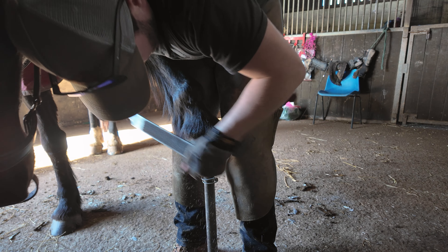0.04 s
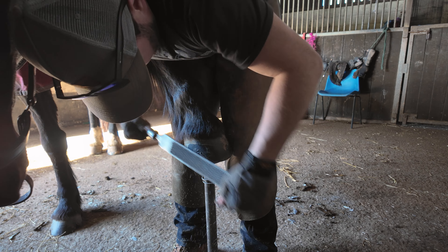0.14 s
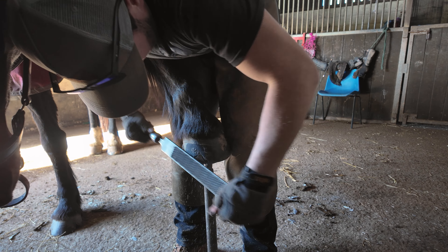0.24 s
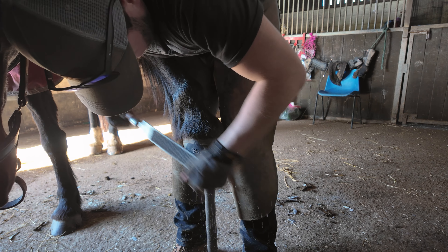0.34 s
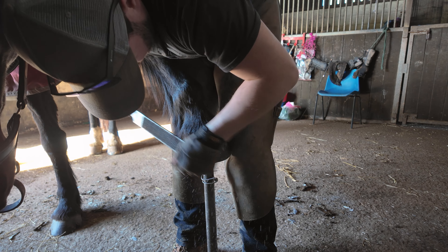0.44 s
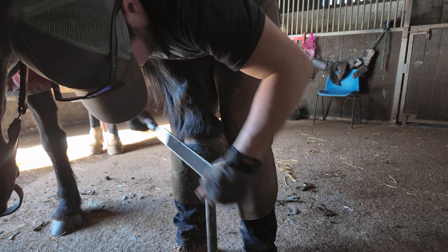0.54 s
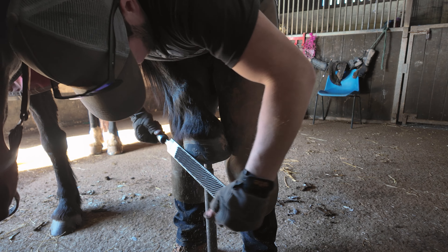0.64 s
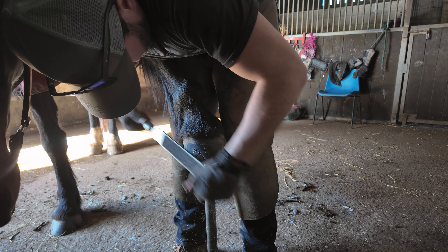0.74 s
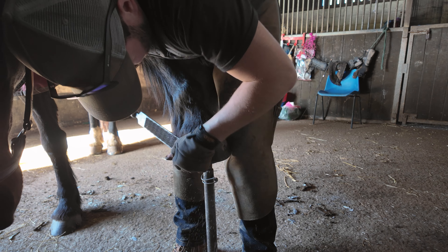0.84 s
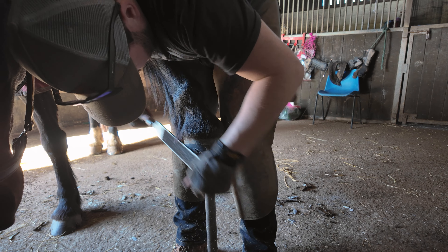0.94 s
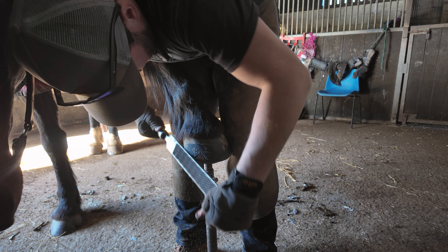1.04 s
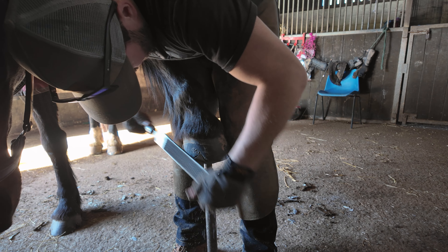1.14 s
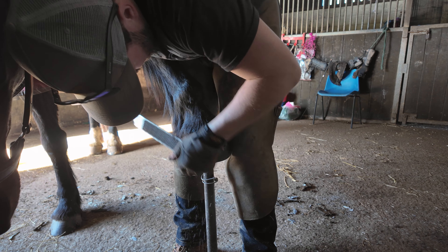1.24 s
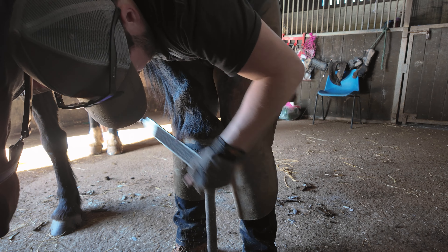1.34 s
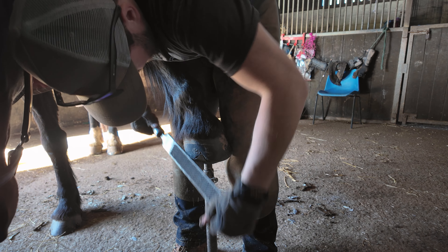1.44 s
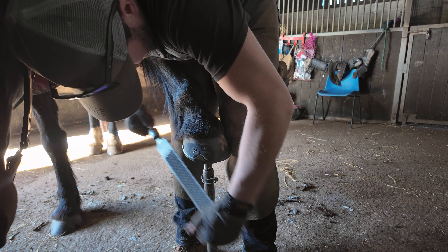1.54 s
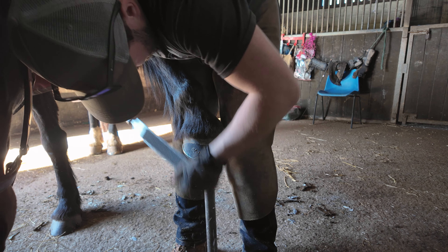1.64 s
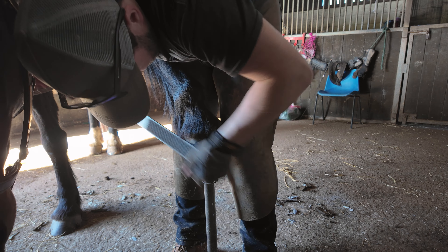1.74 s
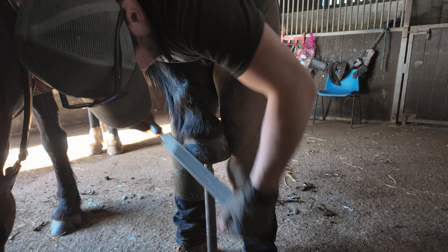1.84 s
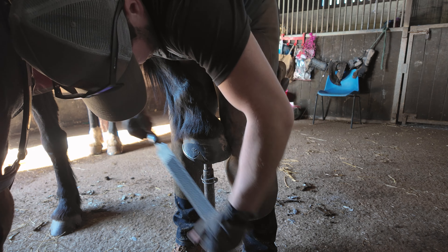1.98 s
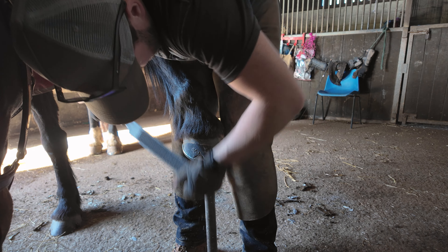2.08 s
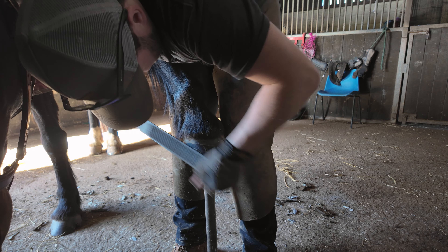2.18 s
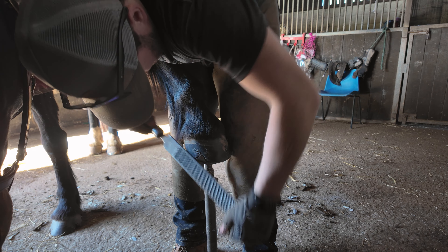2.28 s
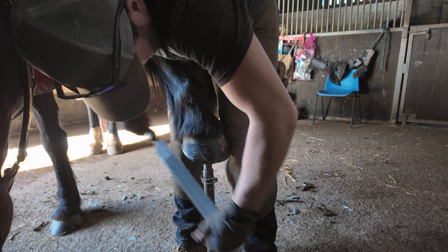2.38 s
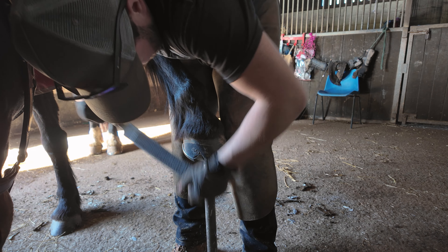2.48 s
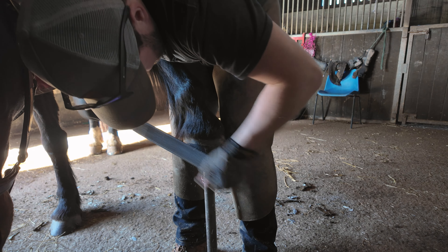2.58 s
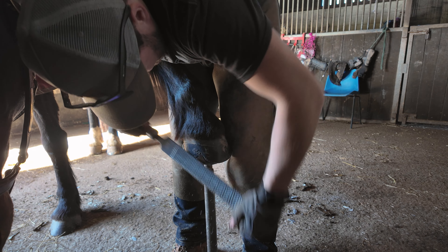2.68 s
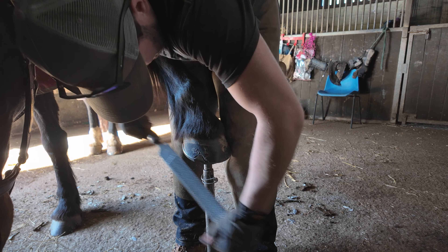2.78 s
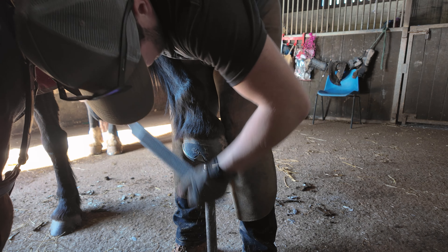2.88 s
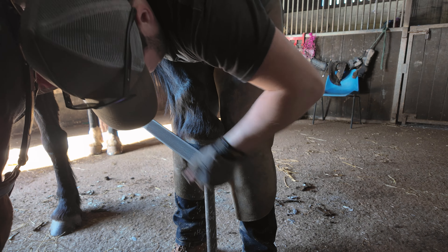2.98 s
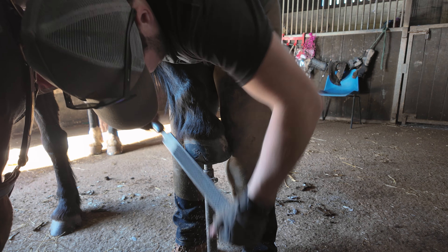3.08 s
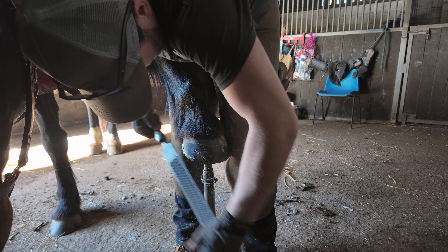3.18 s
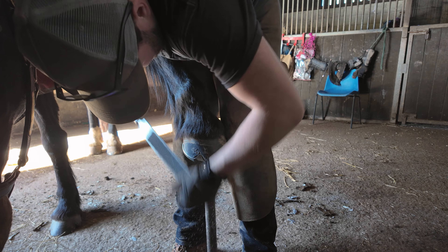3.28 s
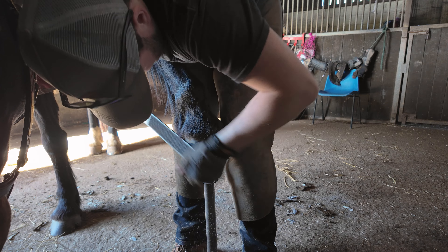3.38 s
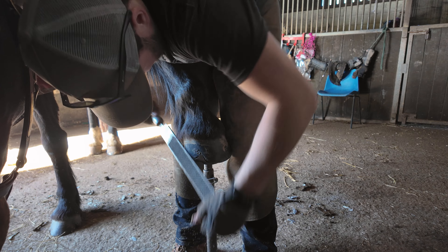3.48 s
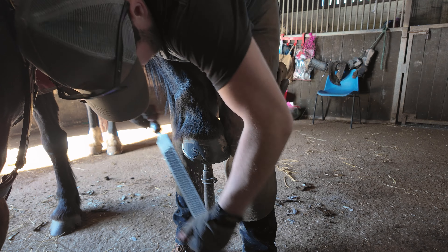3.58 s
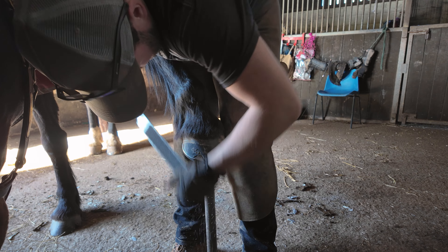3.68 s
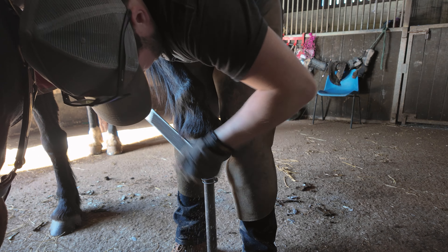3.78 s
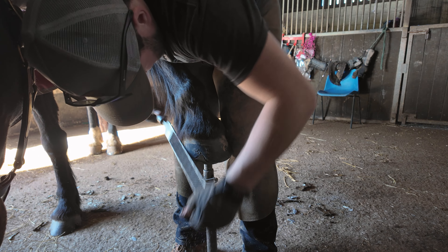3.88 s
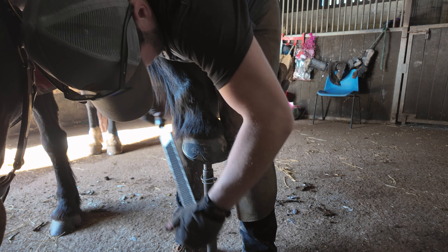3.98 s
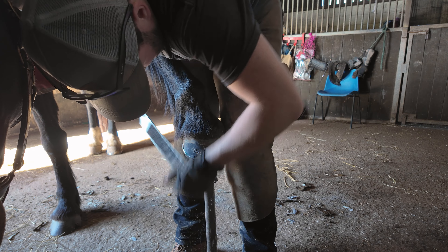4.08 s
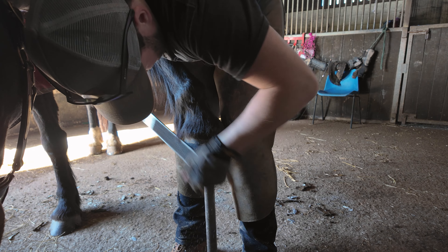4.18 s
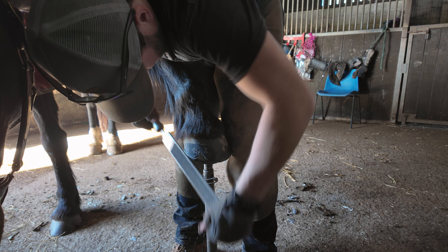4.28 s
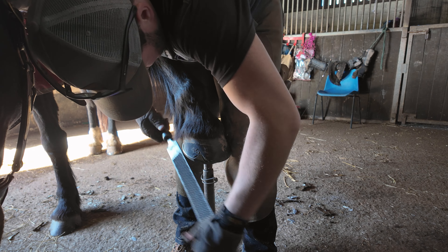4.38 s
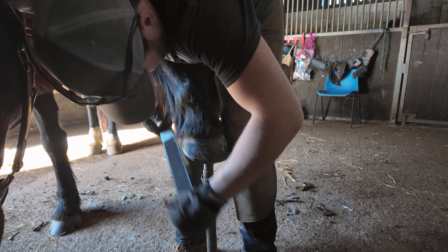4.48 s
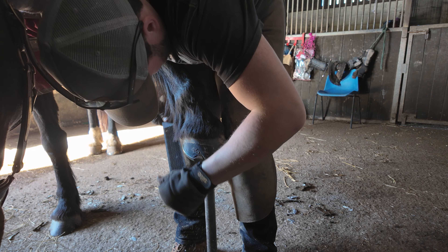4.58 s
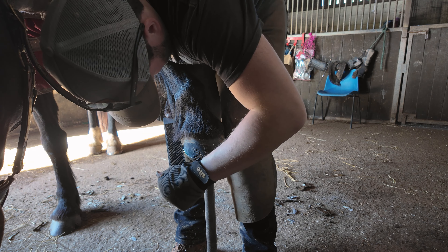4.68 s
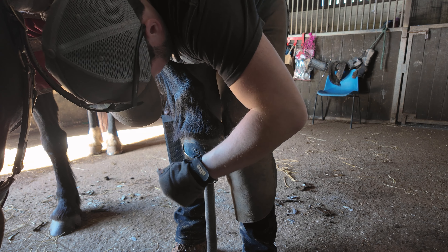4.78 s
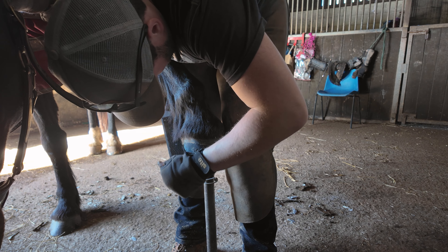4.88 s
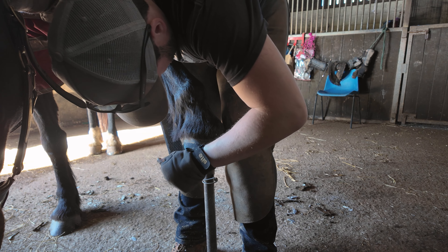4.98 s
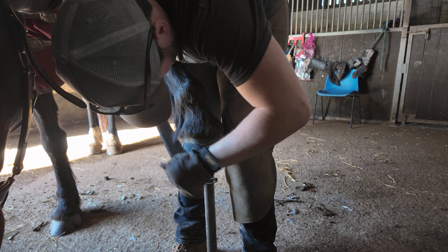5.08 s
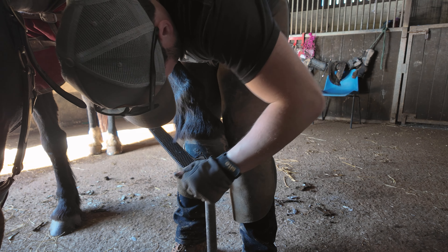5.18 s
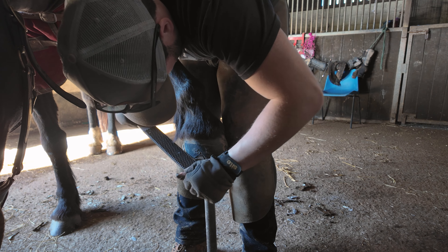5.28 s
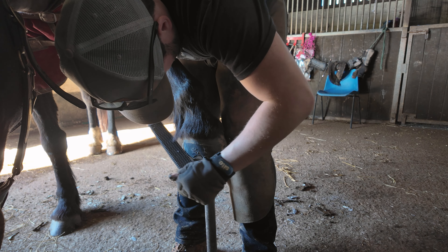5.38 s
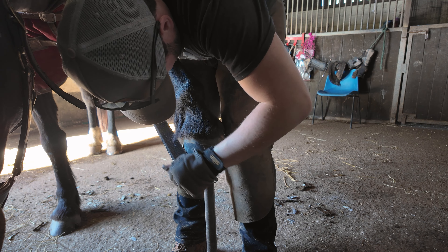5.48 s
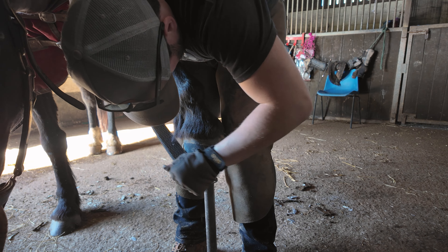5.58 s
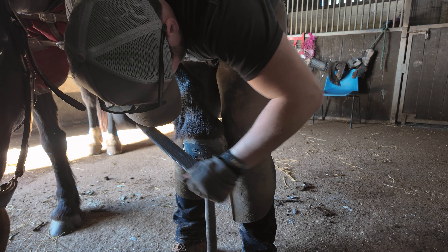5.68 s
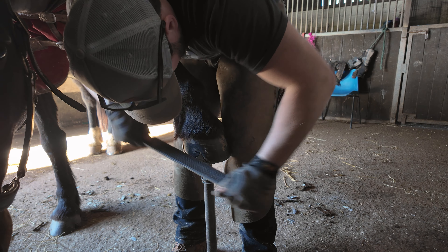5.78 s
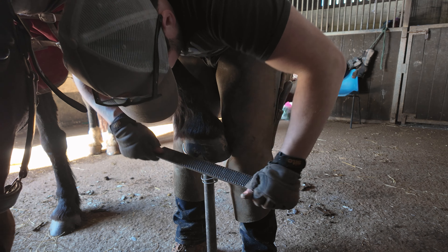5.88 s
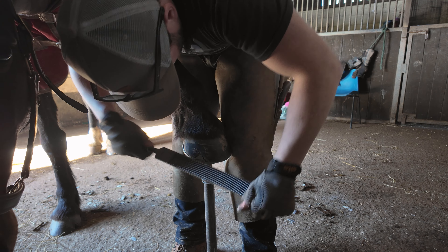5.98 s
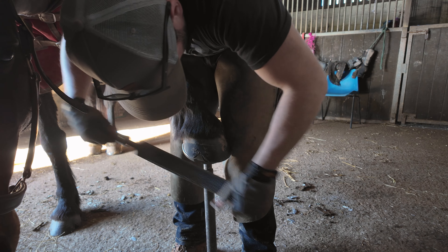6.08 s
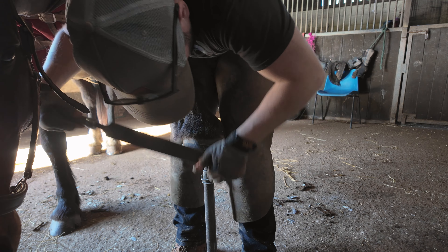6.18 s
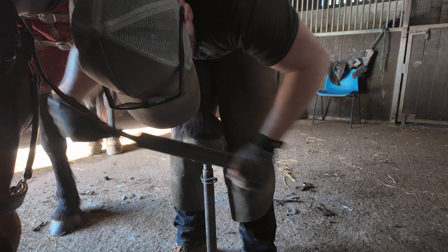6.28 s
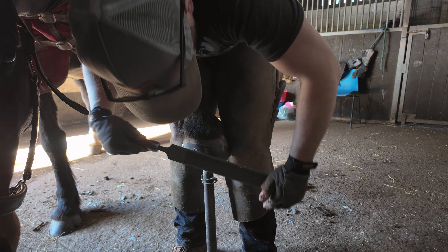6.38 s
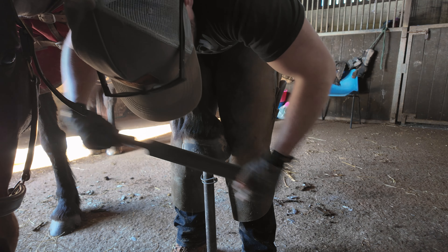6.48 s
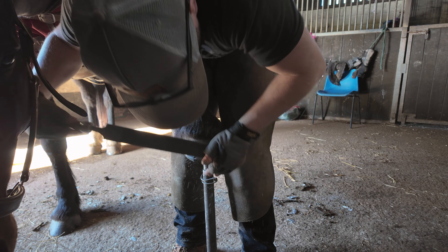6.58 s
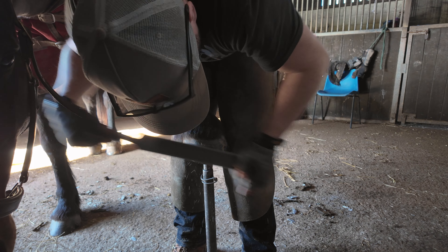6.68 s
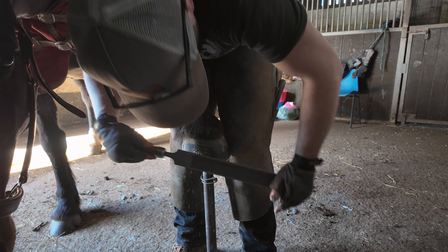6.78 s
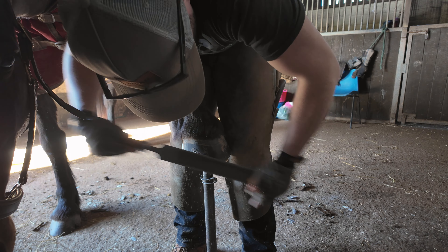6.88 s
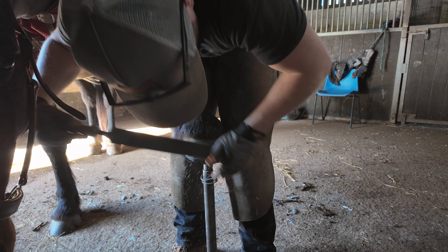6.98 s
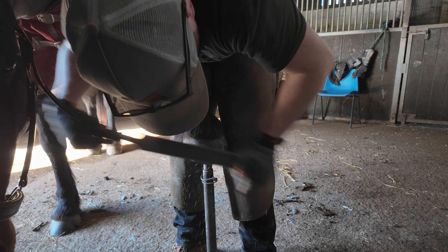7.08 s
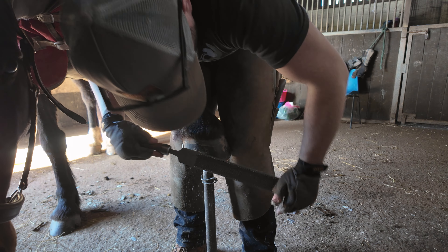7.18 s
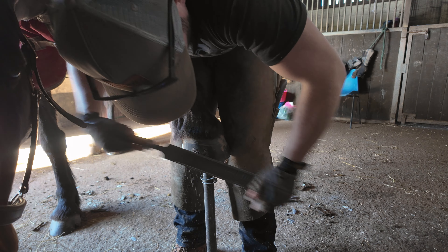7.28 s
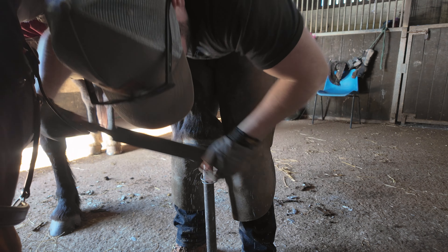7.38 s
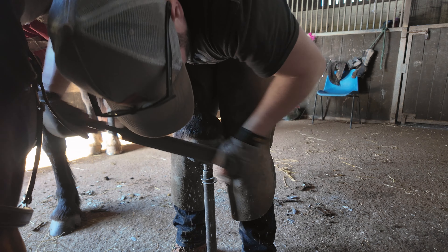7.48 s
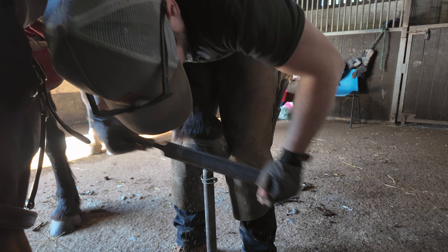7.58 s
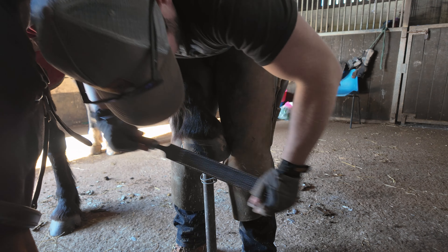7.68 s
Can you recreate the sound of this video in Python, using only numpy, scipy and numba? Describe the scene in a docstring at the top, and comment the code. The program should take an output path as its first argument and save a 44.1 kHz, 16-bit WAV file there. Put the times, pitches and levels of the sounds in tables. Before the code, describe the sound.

In a quiet stable, heard close up, a steel rasp works on a horse's hoof propped on an iron stand. From 0 to 1.5 s gritty scrapes alternate quickly, roughly five a second, bright and metallic with a hollow groan of the hoof around 500 Hz. From 1.8 to 4.4 s come more separate, forceful strokes about 0.4 s apart, with light slides between; a sharp clack stands out at 2.24 s, and the blade catches at 1.3 and 3.05 s. From 4.5 to 5.6 s it falls back to faint touches, small ticks and dull low knocks. A longer stroke swells at 5.75 to 6 s, then after a brief gap quick, softer, looser back-and-forth filing runs from 6.3 s to the end at about 7.7 s. Short, faint echoes and a very low airy hush surround it.

```python
"""In a wooden stable a steel rasp is pushed and drawn over a horse's hoof that rests on an iron stand.
The teeth tear chips of horn: dense random blows excite the modes of the blade, hoof and stand.
Bite, looseness and lean of the blade set how hard each of its modes is struck; filtered blows give the scrape.
Catches, dull knocks, light slides between strokes and short low swells during them are added;
sparse echoes and quiet noise fill the stable."""
import sys
import numpy as np
from scipy import signal
from scipy.io import wavfile
from numba import njit

SR = 44100
rng = np.random.default_rng(int(sys.argv[2]) if len(sys.argv) > 2 else 0)


def bounce(signal):
    """Save signal as a 16-bit WAV file at the path given by the first command-line argument."""
    frames = np.transpose(np.atleast_2d(signal))
    limited = np.clip(frames, -1, 1)
    pcm = np.round(limited * 32767).astype(np.int16)
    wavfile.write(sys.argv[1], SR, pcm)


N = 341334
STEP = 32  # samples between updates of slow quantities
SLOW = np.arange(0, N, STEP) / SR  # times of those updates, s


def gain_of(db):
    """Level definition: 20 dB is a tenfold amplitude."""
    return 10 ** (np.asarray(db) / 20)


def evened(x):
    """Power normalisation: scale to an rms of 1."""
    return x / np.sqrt(np.mean(x ** 2) + 1e-20)


def add(mix, start_s, sound):
    """Superposition: signals add from start_s onward."""
    part = mix[round(start_s * SR):][:len(sound)]
    part += sound[:len(part)]


def read(points, hz):
    """Interpolation of a frequency table on a logarithmic pitch axis."""
    table_hz, value = np.transpose(points)
    return np.interp(np.log(hz + 1), np.log(table_hz + 1), value)


def colour(x, spectrum):
    """Minimum-phase filtering: the log spectrum fixes the phase of a causal response of unit energy."""
    size = 2048
    level_db = np.maximum(read(spectrum, abs(np.fft.fftfreq(size, 1 / SR))), -100)
    log_gain = np.log(gain_of(level_db))
    response = np.exp(np.conj(signal.hilbert(log_gain)))
    taps = np.fft.ifft(response).real[:size // 2]
    return signal.oaconvolve(x, taps / np.linalg.norm(taps))[:N]


def wander(per_s):
    """Random modulation: straight lines between clipped normal draws, per_s draws a second, at the slow times."""
    steps = np.clip(rng.standard_normal(2500), -2.5, 1.6)  # dips go deeper than swells rise
    return np.interp(SLOW * per_s, np.arange(len(steps)), steps)


def held(slow):
    """Sample and hold: each slow value lasts one update step."""
    return np.repeat(slow, STEP)[:N]


def air():
    """Random noise: filtered random pressure of the stable, swelling a little."""
    # Spectrum of the quiet air: pitch_hz [Hz], relative_level_db [dB per Hz]
    spectrum = [(15, -25), (25, 21), (97, -10), (170, -2), (489, -8), (1290, -6.5), (1560, -9.5),
                (4730, -10.5), (6730, -19), (11900, -35), (16000, -59)]
    level_db = -60.5 + 2.0 * held(wander(per_s=3.66))
    return gain_of(level_db) * colour(rng.standard_normal(N), spectrum)


def total(db, rest_db):
    """Incoherent addition: powers of all movements and of the resting level sum."""
    return 10 * np.log10((gain_of(db) ** 2).sum(0) + gain_of(rest_db) ** 2)


def motion():
    """Load kinematics: each stroke, slide or swell rises, holds and falls; power shares weigh the hold on the blade."""
    # Strokes of the rasp: start_s, rise_s, hold_s, fall_s [s]; force_db, change_db over the hold [dB];
    # hoof_db, stand_db relative to the force [dB]; bite (+ teeth cutting, - sliding back),
    # looseness (+ held lightly, - pressed down), lean (+ blade flat on the wall, - on its edge) [no unit];
    # groan_first_hz, groan_last_hz [Hz]
    strokes = [(0.002, 0.041, 0.0093, 0.088, -24, -8, -8.5, -23.5, 0, -0.032, 3, 495, 470),
               (0.147, 0.089, 0.085, 0.03, -28.5, -6, -11, -12.5, 1.83, -0.54, -0.06, 535, 547),
               (0.416, 0.023, 0.039, 0.019, -23.5, -2, -9.5, -19, -2.5, 0.19, 1.06, 620, 625),
               (0.571, 0.023, 0.16, 0.03, -31.5, -5.5, -4.5, -13, 1.12, -1.57, 0, 554, 510),
               (0.794, 0.02, 0.082, 0.072, -32, 10.5, -6.5, -26.5, -2, -0.88, 1, 520, 464),
               (1, 0.05, 0.13, 0.039, -31, -1, -10.5, -14.5, 0.5, -1.6, 0.4, 532, 520),
               (1.212, 0.054, 0.04, 0.12, -32, 6, -10, -22, -2, -0.071, 1.4, 506, 520),
               (1.427, 0.049, 0.14, 0.025, -27.5, -3, -7.5, -19, 0.3, -1.3, 0.43, 580, 510),
               (1.852, 0.037, 0.15, 0.031, -29.5, 0.5, -7, -21.5, 1.84, 0.0068, 0.14, 473, 577),
               (2.325, 0.014, 0.076, 0.072, -29, 3.5, -11, -23, 1.16, 0.062, -1, 560, 560),
               (2.695, 0.026, 0.021, 0.048, -29.5, -1, -5.5, -18, 1.6, 0.089, 0.7, 590, 595),
               (2.765, 0.031, 0.054, 0.056, -28, 0.5, -7, -17, 0, -0.015, 0, 613, 476),
               (3.125, 0.028, 0.094, 0.04, -25, 0, -8.5, -18.5, 2, 0.028, -0.5, 575, 535),
               (3.509, 0.021, 0.12, 0.046, -29, 0.5, -5.5, -19, 1.3, -0.92, -0.1, 557, 564),
               (3.904, 0.034, 0.11, 0.045, -25, -6, -6, -22, 0.24, -1.34, 0.4, 600, 446),
               (4.276, 0.038, 0.1, 0.061, -33, 7.5, -7, -22, 0.83, -1.24, 0.6, 620, 440),
               (4.889, 0.094, .005, 0.043, -42.5, -7, 2, -6, -4, 0.16, -1.7, 520, 503),
               (5.227, 0.051, .005, 0.061, -39.5, -8, -5.5, -13, 0, -1.3, -4.5, 510, 506),
               (5.522, 0.034, 0.045, 0.05, -49, -10, 2.5, -8, -5.5, -0.11, -8, 510, 486),
               (5.731, 0.037, 0.16, 0.15, -39, 7, -7.5, -13.5, 1.24, -0.28, -1.1, 546, 533),
               (6.307, 0.089, 0.068, 0.081, -33, -0.5, -9.5, -16, -0.5, 1.3, -0.3, 630, 487),
               (6.553, 0.038, 0.12, 0.039, -34, -8, -7.5, -10.5, -2, 0.8, 0.24, 523, 487),
               (6.735, 0.035, 0.087, 0.077, -35.5, 2, -12, -23, 0.9, 0.68, 0, 470, 584),
               (6.969, 0.033, 0.091, 0.044, -37, 0, -8.5, -12.5, 0.2, 3, 0.5, 480, 490),
               (7.149, 0.036, 0.09, 0.053, -34.5, 2, -14.5, -16.5, 0.8, 1, 0.6, 500, 503),
               (7.37, 0.026, 0.071, 0.091, -31.5, 0, -5.5, -15, -2, 1.2, -0.8, 514, 480),
               (7.569, 0.089, .005, 0.15, -28.5, 2, -11, -25, 0.4, 0.78, -1.3, 625, 460)]
    # Light slides between strokes, and short low swells of hoof and blade during them:
    # start_s, hold_s [s]; force_db [dB]; hoof_db, stand_db, blade_ring_db relative to the force [dB]
    slides = [(0.493, 0.039, -35, -4.5, -17, 1.3), (1.654, 0.15, -45, -13, -29, -12),
              (1.796, 0.024, -47.5, 0, 1, 8), (2.063, 0.053, -52, -15, -8, -4.5),
              (2.253, 0.061, -38.5, -6, -8, -0.5), (2.654, 0.03, -45, -9, -4, 3),
              (3.054, 0.057, -39.5, -7, -7, 5.3), (3.33, 0.14, -50.5, -13, -15, -5),
              (3.446, 0.035, -46.5, -18, -3.5, -2), (3.682, 0.19, -45.5, -22, -20, -9),
              (3.852, 0.057, -44.5, -23, -13, -3), (4.105, 0.13, -48, -12, -26, -9),
              (4.254, 0.032, -47.5, -10, 2, 10.5), (4.453, 0.1, -48.5, -8, -23, -3.5),
              (4.587, 0.067, -51, -18, -24, -4.5), (4.737, 0.013, -49.5, 5, 0, -2),
              (5.923, 0.078, -43, 9, -0.5, -3), (6.024, 0.18, -50.5, -13, -22, -2.5),
              (6.297, 0.036, -48.5, 4, -28, 6), (6.857, 0.025, -51.5, 11, 0, -.6),
              (7.595, 0.018, -45.5, 3.5, 1.5, -3), (5.297, 0.035, -53, -8, -16, -15),
              (5.54, .05, -53.5, 0, -2, -11)]
    groan_rest_hz = 495
    slide_rise_s, slide_fall_s, slide_fade_db = 0.0077, 0.032, -1.5
    slide_bite, slide_looseness, slide_lean = -0.98, 0.1, 0
    slide_rows = [(start_s, slide_rise_s, hold_s, slide_fall_s, db, slide_fade_db, hoof_db, stand_db,
                   slide_bite, slide_looseness, slide_lean, groan_rest_hz, groan_rest_hz)
                  for start_s, hold_s, db, hoof_db, stand_db, _ in slides]
    extra_ring_db = np.r_[np.zeros(len(strokes)), np.transpose(slides)[-1]][:, None]
    (start, rise, hold, fall, force_db, change_db, hoof_db, stand_db, bite, looseness, lean,
     first_hz, last_hz) = np.vstack([strokes, slide_rows]).T[:, :, None]

    t = SLOW - start - rise  # 0 where the hold begins
    # the force climbs 20 dB in a rise and drops as much in a fall, going on at that slope outside
    swing_db = 20 * (np.minimum(t / rise, 0) - np.maximum((t - hold) / fall, 0))
    held_db = force_db + change_db * np.clip(t / hold, 0, 1)
    moving_db = held_db + swing_db
    # the heavier bodies follow only part of the swing
    hoof_loads_db = held_db + hoof_db + 0.85 * swing_db
    stand_loads_db = held_db + stand_db + 0.35 * swing_db
    # the resting levels: blade and hoof never lie quite still
    scrape_db = total(moving_db, -65.5)
    ring_db = total(moving_db + extra_ring_db, -75)
    load_db = total(hoof_loads_db, -71)
    shake_db = total(stand_loads_db, -65)

    share = gain_of(moving_db - scrape_db) ** 2
    load_share = gain_of(hoof_loads_db - load_db) ** 2
    progress = np.clip((t + rise) / (rise + hold + fall), 0, 1)
    bite_now = bite + 1 * (progress - .5)  # both grow from start to end of each movement
    looseness_now = looseness + 1.37 * (progress - .5)
    travel = (progress - .5) * np.clip(bite + 1, 0, 1)  # along the blade, fading out as bite nears -1
    pitch_hz = first_hz + (last_hz - first_hz) * progress
    groan_hz = groan_rest_hz + (load_share * (pitch_hz - groan_rest_hz)).sum(0)
    hold_on_blade = [(share * x).sum(0) for x in (bite_now, looseness_now, lean, travel)]
    return (scrape_db, ring_db, load_db, shake_db, *hold_on_blade, groan_hz)


def forces(*slow_levels_db):
    """Contact excitation: levels become scrape, blade, hoof and stand strengths, first blows and pressure 0-1."""
    # Teeth catching or the blade landing: start_s [s], level_db [dB],
    # hoof_db relative to the blow [dB], decay_t60_ms [ms]
    catches = [(0.0331, -18, -32, 39), (0.043, -22, -10, 50), (0.169, -26, -5.5, 74), (0.435, -19, 6, 29),
               (0.601, -39, -21, 31), (0.818, -27, -8, 25), (1.022, -31.5, 12, 120), (1.235, -23, -7, 37),
               (1.285, -10, -30, 62), (1.2921, -11, -42, 42), (1.4452, -26.5, 8, 48),
               (1.8134, -24.5, -9, 25.6), (1.866, -28, 4, 33), (2.236, -4, -5.5, 43),
               (2.3445, -21, -35, 62), (2.6637, -33.5, 5, 24), (2.709, -24, 9, 57), (2.798, -17.5, -29, 44),
               (3.054, -14, 4, 53), (3.14, -24, -30, 17), (3.462, -28, -9, 44), (3.523, -26, -12, 20),
               (3.8638, -25, -1, 31), (3.918, -30, -12, 30), (4.2589, -17.5, 0.5, 20),
               (4.311, -33.5, 17, 73), (4.404, -25, -5, 32), (4.743, -36.5, 7, 26),
               (4.892, -43.5, 19.5, 110), (5.26, -30, -17, 30), (5.272, -33, -32, 41), (5.625, -30, -20, 6),
               (5.706, -36, -8, 29), (5.7435, -28, -6, 27), (6.0967, -31.5, -3, 85),
               (6.3038, -37, 13.5, 13), (6.568, -25, -5.5, 30), (6.585, -29.5, 4, 52),
               (7.021, -32, -16.5, 42), (7.054, -24, -21, 41), (7.343, -41.5, 21.5, 21),
               (7.392, -36, -14, 24), (7.403, -35, 13.5, 54), (7.654, -24.5, 6, 130)]
    levels_db = [np.interp(np.arange(N) / SR, SLOW, db) for db in slow_levels_db]
    stall = round(.009 * SR)
    for start_s, *_ in catches:  # the blade stalls or hovers just before it catches
        at = round(start_s * SR)
        for db in levels_db:
            db[at - stall:at] = np.minimum(db[at - stall:at], db[at - stall])
    scrape, blade, hoof, stand = (gain_of(db) for db in levels_db)
    pressure = np.clip((levels_db[0][::STEP] + 66.5) / 32, 0, 1)

    first = np.zeros(N)
    ms = np.arange(SR // 4) * 1000 / SR
    for start_s, level_db, hoof_db, decay_ms in catches:
        burst = gain_of(level_db - 10.0 - 60 * ms / decay_ms)  # envelope of a spray of chips
        add(scrape, start_s, burst)
        add(blade, start_s, burst)
        add(hoof, start_s, gain_of(hoof_db) * burst)
        add(first, start_s, gain_of([level_db - 11.0]))
    return scrape, blade, hoof, stand, first, pressure


def chips(per_s, spread_db, chatter_db):
    """Shot noise: single-tooth blows at random moments, a few large, their strength modulated by chatter."""
    chatter = held(wander(per_s=160))
    size = gain_of(spread_db * np.minimum(rng.exponential(1, N), 4) + chatter_db * chatter)
    struck = rng.random(N) < per_s / SR
    return evened(size * rng.choice([-1., 1.], N) * struck)


def bunching():
    """Amplitude modulation: the teeth bite in clumps."""
    return evened(gain_of(1.4 * held(wander(per_s=55))))


def ring(x, hz, width_hz):
    """Fixed resonance: one complex pole with a peak gain near 1."""
    r = np.exp(-np.pi * width_hz / SR)
    return 2 * signal.lfilter([1 - r], [1, -r * np.exp(2j * np.pi * hz / SR)], x).real


@njit
def ring_moving(x, gain, pole, step):
    """Driven damped oscillator: one mode whose drive, pitch and damping change slowly."""
    out, state = np.zeros(len(x)), 0j
    for n in range(len(x)):
        state = pole[n // step] * state + gain[n // step] * x[n]
        out[n] = state.real
    return out


def mode(blows, level_db, width_hz, moving_hz, moving_width_hz, filter_hz, filter_width_hz):
    """Modal response: a moving resonance, then a broad fixed one that weakens sound far from the mode."""
    gain = gain_of(level_db) * 2 * np.pi * width_hz / SR
    pole = np.exp((2j * moving_hz - moving_width_hz) * np.pi / SR)
    return ring(ring_moving(blows, gain, pole, STEP), filter_hz, filter_width_hz)


def blade_ring(blows, pressure, bite, looseness, lean, travel):
    """Modal excitation: the hold weighs each blade mode; pressure on the hoof damps and detunes it."""
    # Bending and twisting modes: pitch_hz, nominal_width_hz [Hz], relative_level_db [dB],
    # bite_db, looseness_db, lean_db gained per unit of each [dB]
    modes = [(875, 48, 0.5, -3, -3, 1), (1077.5, 30, -2, -3.5, 3, 0.5), (1758, 53, -2, -4, -2.3, 0.8),
             (1855, 67, -1, 2.5, -0.5, -1.5), (2192, 29, 0, -3.5, 3.5, 3), (3002, 31, 3.5, -2.5, 4.5, 0.8),
             (3067, 48, 4.5, 1, -1.5, 1.4), (3458, 66, 2, 0, -0.5, 0), (3854, 39, 2, -3.5, 1.3, 1.5),
             (3962, 61, 1.5, 2, -4.5, 3.8), (4420, 32, 7, -1, -1, -0.5), (4745, 43, 5, -0.5, -0.5, -2),
             (4818, 50, 0.5, -0.5, -7.5, -1), (5390, 51, 4, 2, -5.5, 0.8), (5442, 31, 4.5, -2, 1, 0.5),
             (6010, 48, -1, 0.5, -9.5, 1), (6060, 36, 2.5, -3, -2.5, 4.5), (6303, 105, 1.5, 4.5, -4.5, 1.7),
             (6537, 46, 4, -1, 1, 2.2), (6890, 29, -1.5, -1, -5, 4), (7400, 53, -7.5, 8, -4.5, 0.5),
             (7754, 34, -1.5, -0.5, 1, -0.5), (8620, 89, -13, 7, -1.5, 4), (9000, 42, -4, 1, 1.5, 0),
             (9680, 81, -17.5, 6.5, -1.5, 4), (10430, 140, -16.5, 2.5, 0, -0.3),
             (11560, 26, -15, 0.5, 2.5, -1), (12040, 26, -19, -1, 1, 0), (13000, 90, -31, 4, 1, 0),
             (14000, 45, -33, 0, 1, 0), (15050, 45, -30, 1, 1, 0)]
    out = np.zeros(N)
    for hz, width, db, bite_db, loose_db, lean_db in modes:
        sliding_db = 4.92 * wander(per_s=40)  # the contact slides over the nodes and bellies of the mode
        level_db = db + bite_db * bite + loose_db * looseness + lean_db * lean + sliding_db
        # modes wider than 35.4 Hz stiffen as the cut runs up the blade
        climb_hz = 3 * max(width - 35.4, 0) * travel
        detuned = hz + 26 * pressure * wander(per_s=25) + climb_hz
        # the lifted blade rings on
        damped = width * (0.63 + 1.0 * pressure) * np.exp(-.05 * looseness + 0.39 * wander(per_s=30))
        out += mode(blows, level_db, width, detuned, damped, hz, 8 * width)
    return out * gain_of(5.5)


def horn_scrape(blows):
    """Source-filter principle: the spectrum of teeth on horn colours the blows."""
    # Scrape spectrum: pitch_hz [Hz], relative_level_db [dB per Hz]
    spectrum = [(500, -25.5), (900, -5), (1400, -7), (2500, -3.5), (4500, -5.5), (6300, -6), (7600, -10),
                (9700, -20.5), (12500, -25.5), (15000, -39), (16000, -44)]
    return gain_of(-8.0) * colour(blows, spectrum)


def groan(blows, hz):
    """Load-dependent resonance: the lowest hoof mode glides as the load moves along the wall."""
    width_hz = 46
    level_db = 0.5 + 4.1 * wander(per_s=23)
    moving_hz = hz * (1 + 0.025 * wander(per_s=23))
    return mode(blows, level_db, width_hz, moving_hz, width_hz, 542, 280)


def body(blows, modes):
    """Modal superposition: a damped solid whose modes drift and take turns as the load shifts."""
    out = np.zeros(N)
    for hz, width, db in modes:
        level_db = db + 3.7 * wander(per_s=20)
        moving_hz = hz * (1 + 0.065 * wander(per_s=9))
        out += mode(blows, level_db, width, moving_hz, width, hz, 5 * width)
    return out


def hoof_thump(blows, groan_hz):
    """Forced vibration: the blows drive the gliding groan and the higher modes of the hoof."""
    # Higher hoof modes: central_pitch_hz, width_hz [Hz], relative_level_db [dB]
    modes = [(610, 74, -8), (743, 160, -6.5), (1202, 198, -10)]
    return gain_of(16.0) * (groan(blows, groan_hz) + body(blows, modes))


def stand_shake(blows):
    """Structure-borne vibration: the shoves drive the low modes of the iron stand."""
    # Stand modes: central_pitch_hz, width_hz [Hz], relative_level_db [dB]
    modes = [(76, 35, -15), (96.8, 12.2, -1.5), (125.7, 40.5, -3.5), (229.2, 31.4, -0.5), (289.7, 42, 1.5)]
    return gain_of(20) * body(blows, modes)


def knocks():
    """Damped oscillation: each knock is a short low ring with a soft start."""
    # Dull knocks of the hoof on the stand: start_s [s], level_db before the soft start [dB], pitch_hz [Hz]
    blows = [(0.12, -32, 310), (0.74, -35, 101), (2.041, -34.5, 100), (2.241, -32, 104.7), (4.01, -32, 91),
             (4.743, -35.5, 127), (5.283, -38, 111), (5.545, -39, 121), (5.706, -37.5, 105),
             (5.935, -31.5, 103), (6.006, -41, 271), (6.917, -39, 95)]
    out, t = np.zeros(N), np.arange(SR // 8) / SR
    for start_s, level_db, hz in blows:
        envelope = gain_of(level_db - 640 * t) * (1 - np.exp(-t / 0.0011))  # falls 640 dB per s
        add(out, start_s, envelope * np.sin(2 * np.pi * hz * t))
    return out


def stable(x):
    """Reverberation: sparse echoes of random sign, each band dying at its own speed."""
    # Reverberation of the stable: pitch_hz [Hz], decay_t60_s [s]
    decay = [(200, 0.75), (530, 0.48), (1400, 0.42), (3700, 0.34), (9700, 0.091)]
    taps = np.zeros(SR // 2)
    at = np.arange(200, len(taps) - 20, 20)
    taps[at + rng.integers(0, 20, len(at))] = rng.choice([-1., 1.], len(at))
    hz, t, bands = signal.stft(taps, SR, nperseg=256)
    dying = bands * gain_of(-60 * t / read(decay, hz)[:, None])
    tail = signal.istft(dying, SR, nperseg=256)[1]
    return signal.fftconvolve(x, tail / np.linalg.norm(tail))[:N]


def scene():
    """Linear superposition: blade, horn, hoof, stand and knocks, with their echoes and the air."""
    *levels_db, bite, looseness, lean, travel, groan_hz = motion()
    scrape, blade, hoof, stand, first, pressure = forces(*levels_db)
    teeth = chips(per_s=9000, spread_db=3.0, chatter_db=3.0)
    dust = chips(per_s=13000, spread_db=2.2, chatter_db=3.5)
    lumps = chips(per_s=2500, spread_db=2.5, chatter_db=1.0)
    shoves = chips(per_s=1500, spread_db=3.5, chatter_db=5.5)
    clumps = bunching()
    rasp = blade_ring(blade * teeth * clumps + first, pressure, bite, looseness, lean, travel)
    horn = horn_scrape(scrape * dust * clumps + gain_of(8.0) * first)
    solids = hoof_thump(hoof * lumps, groan_hz) + stand_shake(stand * shoves)
    near = rasp + horn + solids + knocks()
    return (near + gain_of(-16.5) * stable(near) + air())[None]


def record(dry):
    """Band limitation: the microphone drops the deep bass, then a low-pass at 16 kHz cuts the top."""
    thin = signal.sosfilt(signal.butter(3, 55, "highpass", fs=SR, output="sos"), dry)
    low_pass = signal.firwin(511, 16000, window=("kaiser", 9), fs=SR)
    return signal.oaconvolve(thin, low_pass[None], "same")


dry = scene()
out = record(dry)
bounce(out)
```